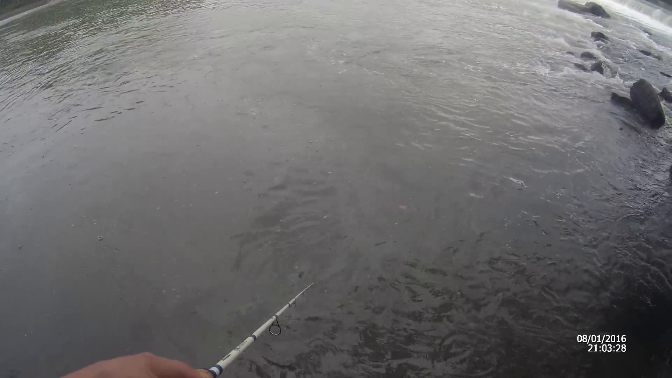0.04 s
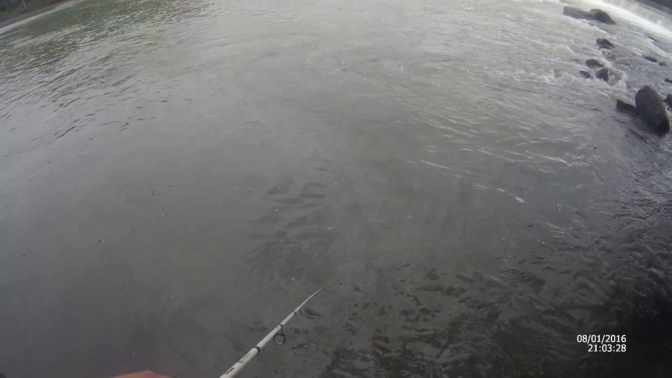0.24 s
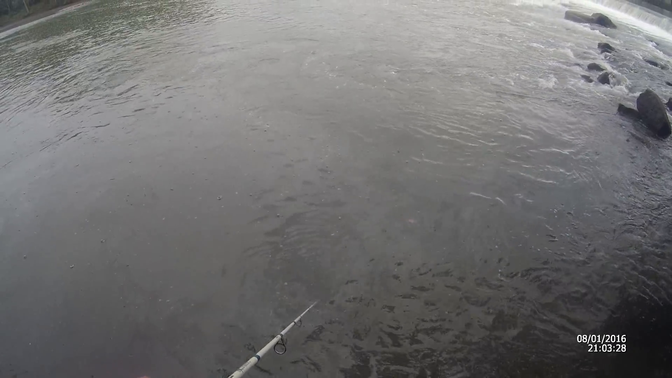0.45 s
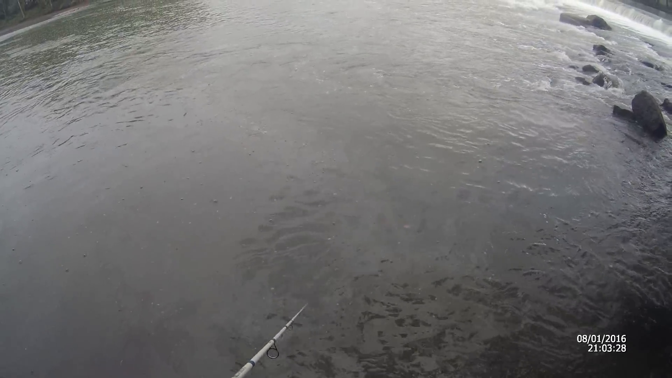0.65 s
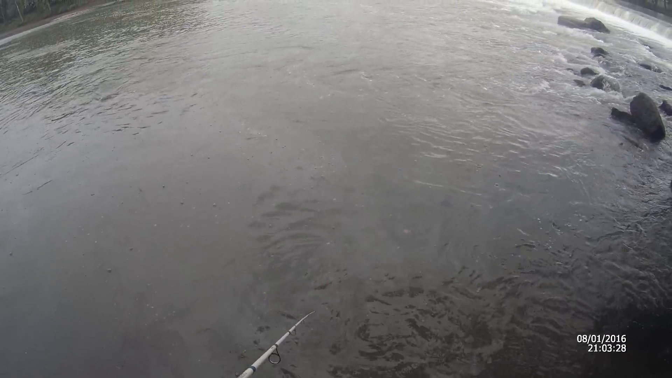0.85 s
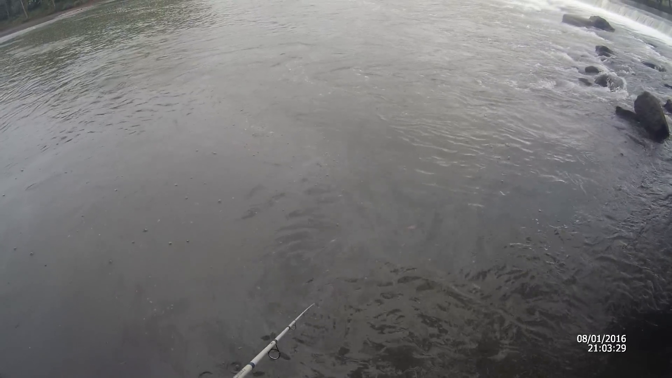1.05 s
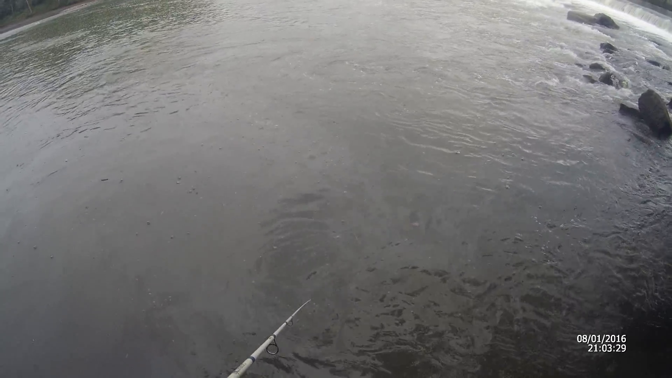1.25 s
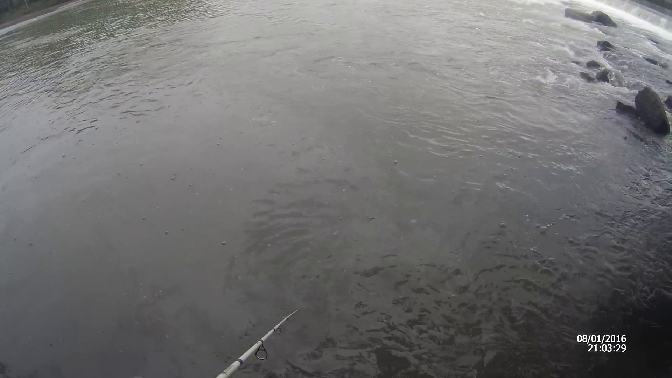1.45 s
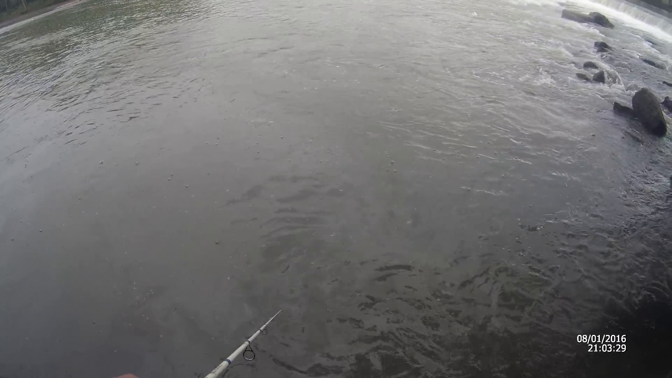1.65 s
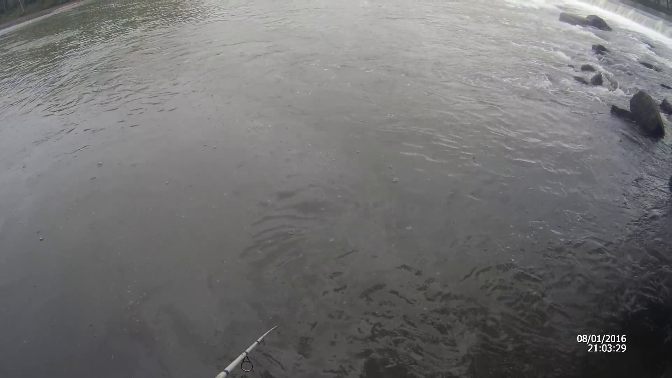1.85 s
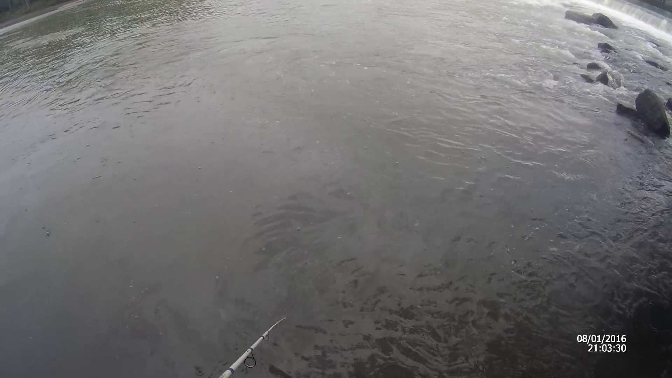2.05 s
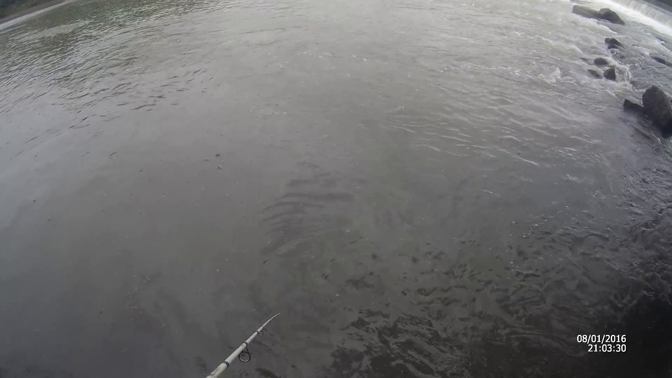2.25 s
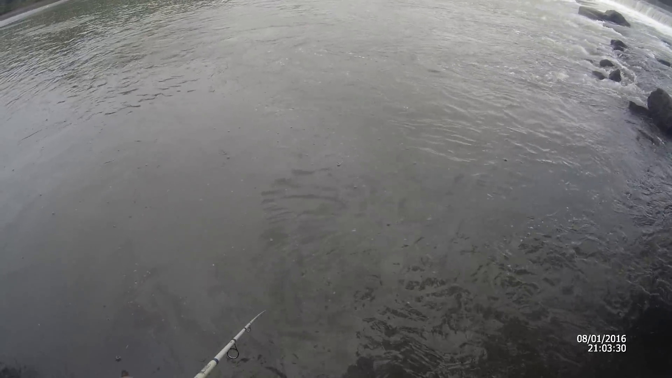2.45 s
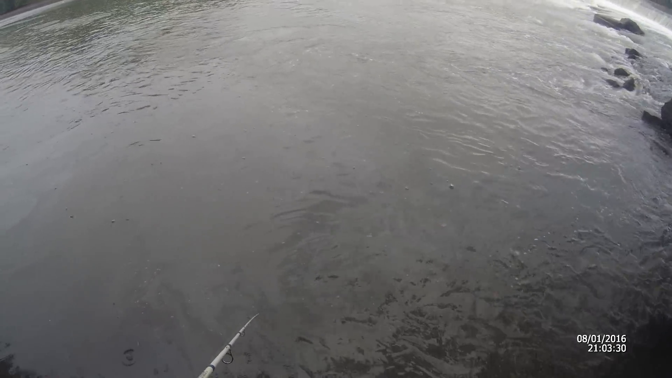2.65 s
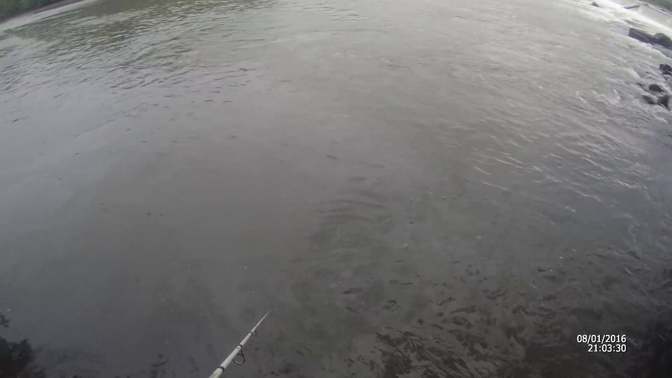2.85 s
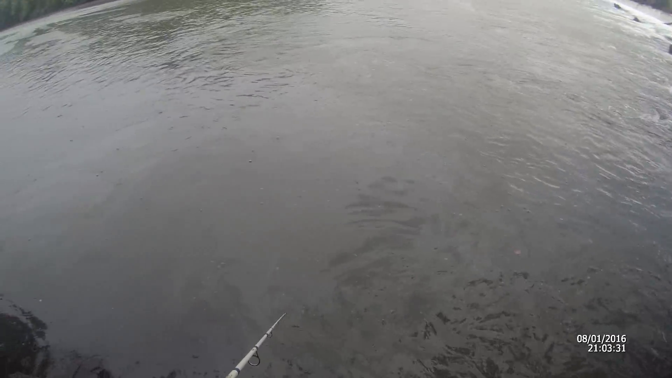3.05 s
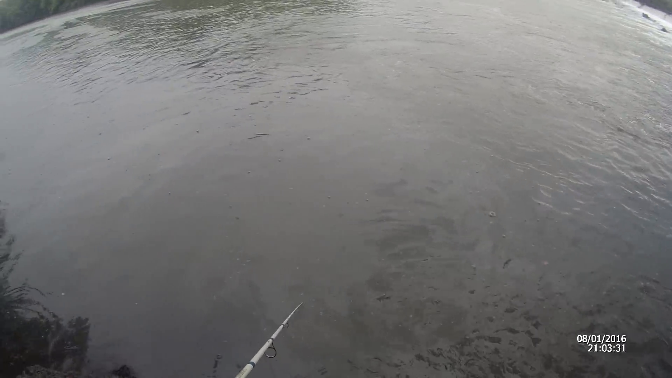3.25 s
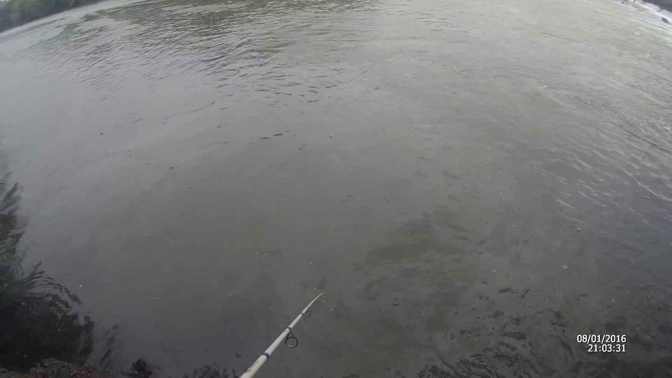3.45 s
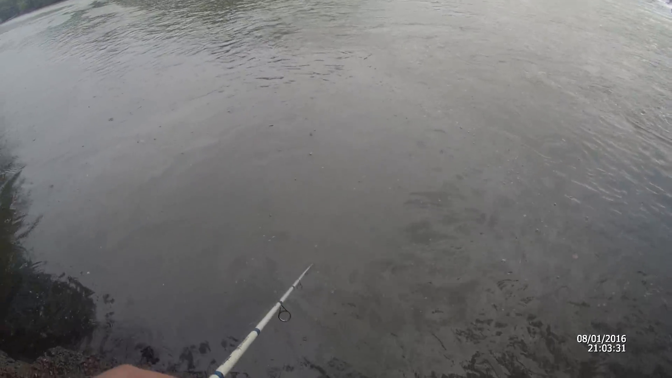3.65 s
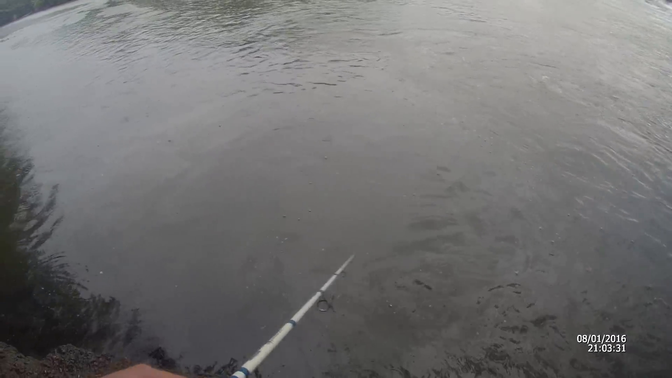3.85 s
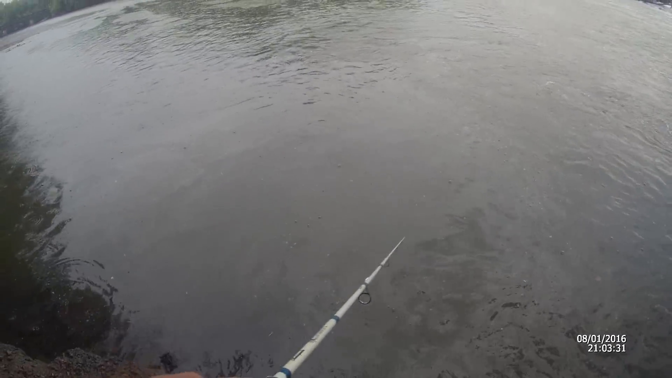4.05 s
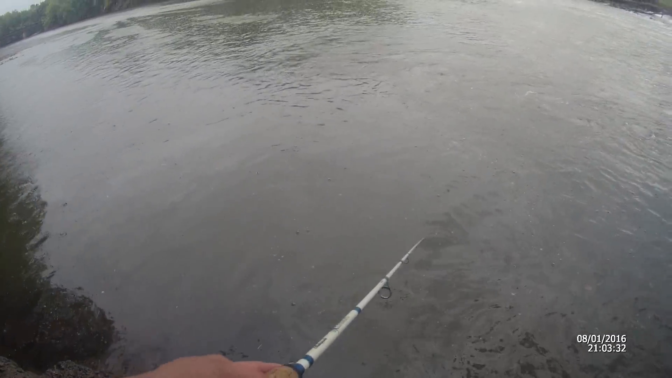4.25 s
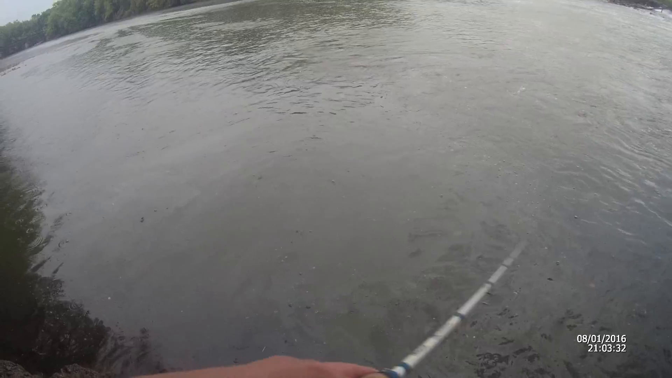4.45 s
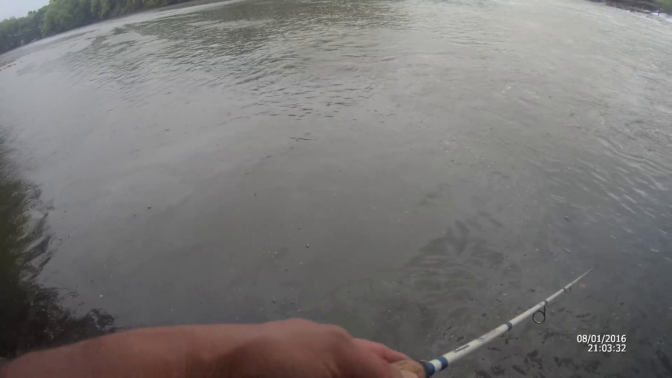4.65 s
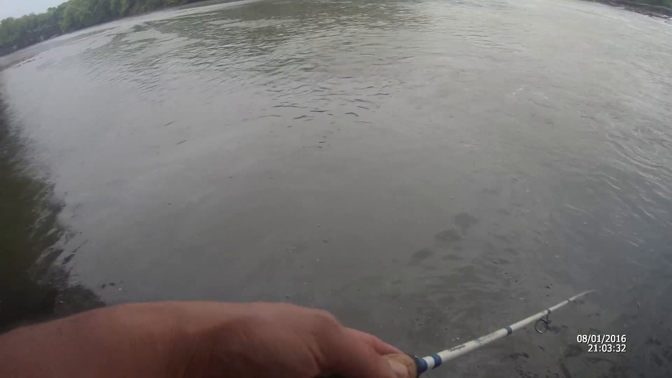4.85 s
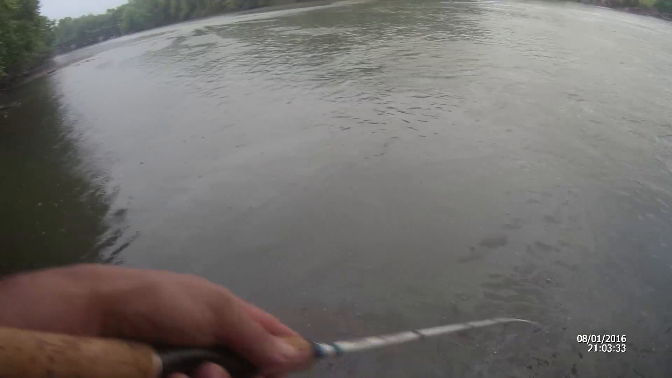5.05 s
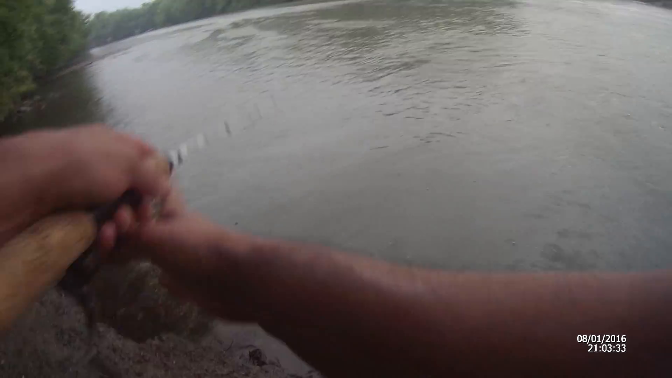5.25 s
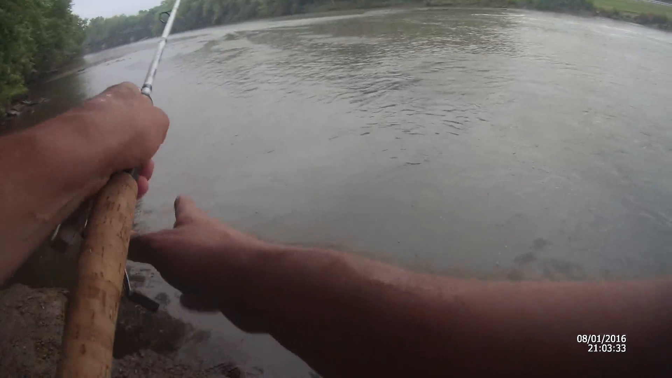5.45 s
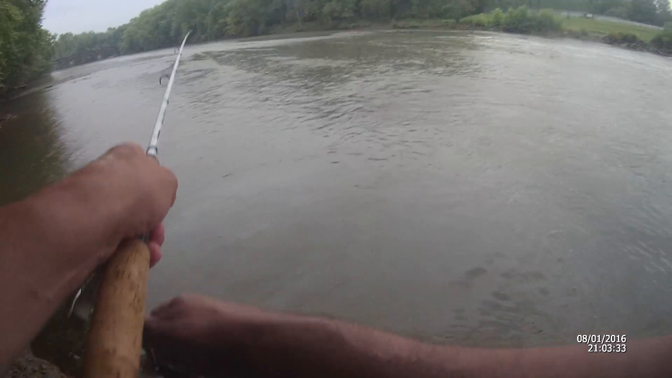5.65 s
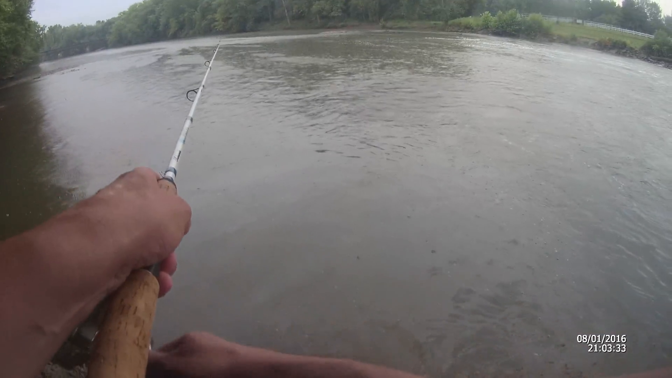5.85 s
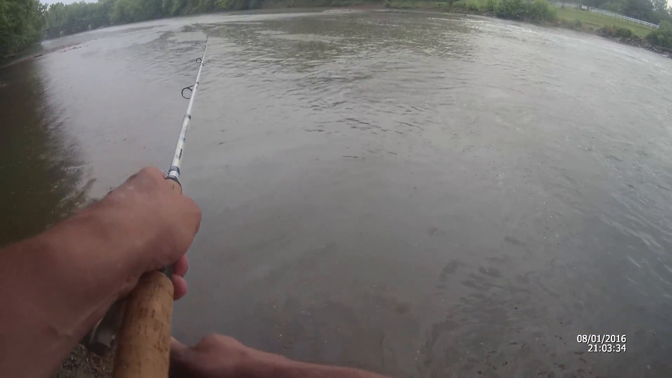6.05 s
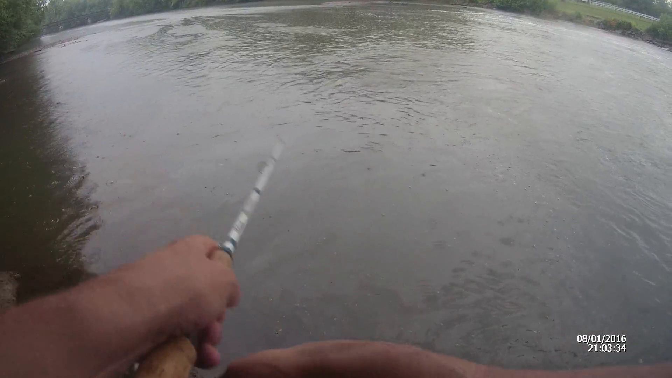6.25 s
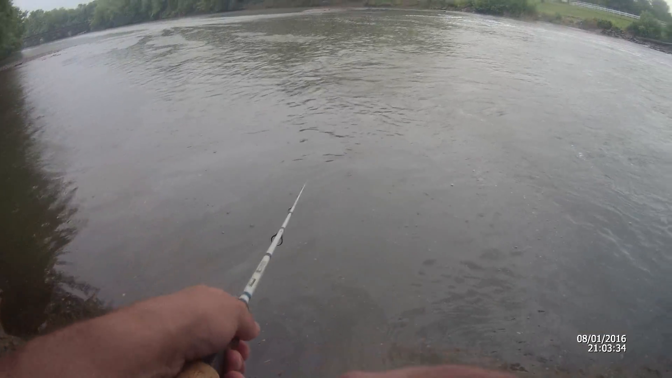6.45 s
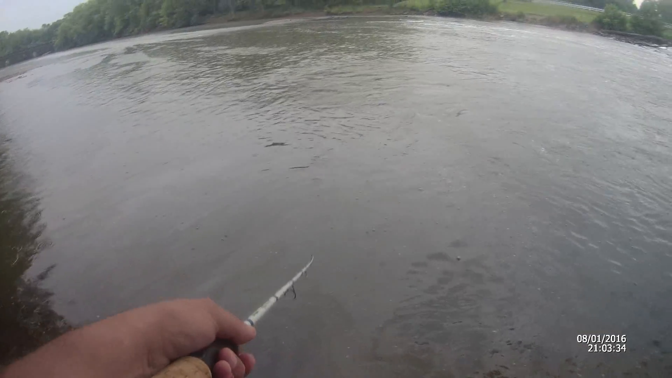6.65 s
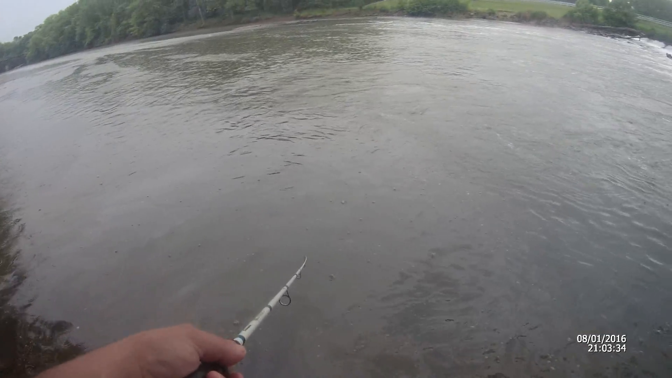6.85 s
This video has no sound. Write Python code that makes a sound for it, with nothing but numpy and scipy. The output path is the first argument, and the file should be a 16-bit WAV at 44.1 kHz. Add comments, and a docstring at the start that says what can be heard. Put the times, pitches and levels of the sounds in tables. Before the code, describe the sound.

Continuous dull river noise, strongest in the midrange with little treble, heard by a microphone enclosed in plastic outdoors. A crisp, very short drop click stands out early. Later the angler moves: low chest bumps, plasticky ticks, a knock and a quick rasp of fabric with a swell of rumble come tightly together, followed by small separate thumps. A weak hum fades near the end while faint hiss and whine remain.

```python
"""At a river bank a small camera in a sealed plastic case hangs on an angler's chest.
The water's rush, noise with a drifting spectrum, comes muffled over low sway noise, a hum, hiss and whine.
A drop clicks on the case: impulses excite its damped modes. Ticks do the same with short noise bursts.
Thuds are decaying sines, low but for one higher knock, and a rub of cloth is stick-slip noise through
resonances with a rumble; these come as the angler swings the rod."""
import sys
import numpy as np
from scipy import signal
from scipy.fft import rfft, irfft, next_fast_len
from scipy.io import wavfile
from scipy.ndimage import uniform_filter1d

SR = 44100
rng = np.random.default_rng(int(sys.argv[2]) if len(sys.argv) > 2 else 0)


def store_pcm(level_fs):
    """Save levels as 16-bit WAV."""
    pcm = np.round(np.clip(level_fs, -1, 1) * 32767).astype(np.int16)
    wavfile.write(sys.argv[1], SR, np.atleast_2d(pcm).T)


N = 304982


def gain_of(db):
    """Level definition: decibels to an amplitude factor."""
    return 10 ** (np.asarray(db) / 20)


def evened(x):
    """Normalization of signal power: scales to rms 1."""
    return x / np.sqrt(np.mean(x ** 2) + 1e-20)


def read(points, hz):
    """Linear interpolation of a spectrum on a log-frequency axis."""
    f, value = np.transpose(points)
    return np.interp(np.log(hz + 1), np.log(f + 1), value)


def curve(rows, t):
    """Linear interpolation of a (t/s, level/dB) table at the times t."""
    times, level_db = np.transpose(rows)
    return np.interp(t, times, level_db)


def add(mix, s, sound):
    """Superposition: adds a sound into the mix at s seconds."""
    part = mix[round(s * SR):][:len(sound)]
    part += sound[:len(part)]


def resonate(x, hz, width):
    """Resonance by heterodyning: shifts hz to zero, smooths and shifts back, with gain 1 at the peak."""
    turn = np.exp(2j * np.pi * hz * np.arange(len(x)) / SR)
    r = np.exp(-np.pi * width / SR)
    smooth = signal.lfilter([1 - r], [1, -r], x / turn)
    return 2 * (turn * smooth).real


def coloured(points):
    """Spectral shaping: white noise weighted in frequency gives steady noise of rms 1."""
    size = next_fast_len(N)
    spectrum = rfft(rng.standard_normal(size))
    weight = gain_of(read(points, np.fft.rfftfreq(size, 1 / SR)))
    return evened(irfft(spectrum * weight, size)[:N])


def river(patchy_db=0.5, flicker_db=0.44):
    """Turbulent noise: random short-time spectra with drifting patches and a flicker shared by all bands."""
    # the rush inside the case: f/Hz, relative spectral density level/dB
    rush_spectrum = [(88, -27), (150, -4), (422, -6), (870, -16), (944, -11), (1090, -16.5), (1230, -4.5),
                     (1550, 1.5), (1710, -7), (2220, -9), (2930, -19.5), (4420, -21.5), (4960, -22),
                     (5560, -14.5), (7600, -39), (9880, -71), (16700, -120)]
    # narrow humps that the case adds: f/Hz, width/Hz, level added at the centre/dB
    case_humps = [(2620, 250, 0.5), (3530, 180, 2), (4220, 150, 2), (5740, 390, -0.5)]
    # level of the rush: t/s, level/dB
    rush_level = [(0.0, -50), (1.5, -49.5), (4.1, -51), (4.45, -50), (5.3, -52.5), (6.92, -51)]
    frames, hz = N // 256 + 5, np.fft.rfftfreq(1024, 1 / SR)
    a, b, patches = rng.standard_normal((frames, 513, 3)).T
    patches = uniform_filter1d(patches, size=10, axis=0)  # over frequency
    patches = evened(uniform_filter1d(patches, size=12, axis=1))  # over time
    flicker = evened(uniform_filter1d(rng.standard_normal(frames), size=3))
    level_db = curve(rush_level, np.arange(frames) * 256 / SR)
    humps_db = sum(db / (1 + (2 * (hz - f) / width) ** 2) for f, width, db in case_humps)
    colour_db = read(rush_spectrum, hz) + humps_db
    field_db = colour_db[:, None] + level_db - level_db.mean()
    field_db = field_db + patchy_db * patches + flicker_db * flicker
    spectra = (a + 1j * b) * gain_of(field_db)
    rush = signal.istft(spectra, nperseg=1024, noverlap=768)[1][:N]
    return gain_of(level_db.mean()) * evened(rush)


def sway():
    """Slow pressure of air and body sway: low-band noise plus a slower one, amplitude-modulated by heaves."""
    # slow pressure on the microphone: f/Hz, relative spectral density level/dB
    sway_spectrum = [(9, -16), (15, -4.5), (25, -2.5), (50, -8), (100, -10.5), (200, -27.5), (400, -56)]
    # Gaussian swells as the body moves: t/s, level/dB, half length to 1/e/s
    heave_swells = [(0.59, -59, 0.11), (3.605, -55, .12), (3.95, -50, .12), (5.206, -42.5, 0.18),
                    (5.5, -45.5, 0.091), (6.3, -50, 0.24)]
    sway_db, heave_rest_db = -57.5, -60
    t = np.arange(N) / SR
    heave = coloured([(1, -26), (4, -6), (11, -0.5), (20, -13), (30, -78.5)])  # f/Hz, level/dB
    swell = sum(gain_of(db) * np.exp(-((t - s) / half) ** 2) for s, db, half in heave_swells)
    return gain_of(sway_db) * coloured(sway_spectrum) + (gain_of(heave_rest_db) + swell) * heave


def hum():
    """Pure tone plus narrow-band noise: their beating makes the hum tremble as it sags and fades."""
    hum_hz, start_db, sag_db_per_s = 125.3, -62, 0.8
    fade_s = 5.1  # the fade to silence starts here and takes one second
    t = np.arange(N) / SR
    tone = np.sqrt(2) * np.sin(2 * np.pi * hum_hz * t)
    fuzz = evened(resonate(rng.standard_normal(N), hum_hz, 3.0))
    fade = np.clip(fade_s + 1 - t, 0, 1)
    return gain_of(start_db - sag_db_per_s * t) * (0.89 * tone + 0.39 * fuzz) * fade


def electronics():
    """Electronic noise floor: the preamplifier's broadband hiss and steady sinusoids of whine."""
    # steady tones: f/Hz, rms level/dB
    whine_tones = [(3208, -82), (6115, -83), (6417, -77.5), (6616, -86), (6718, -85.5), (7219, -98),
                   (9125, -100), (10637, -87), (12828, -96)]
    hiss_db = -71.5
    t = np.arange(N) / SR
    whine = np.zeros(N)
    for hz, db in whine_tones:
        whine += gain_of(db) * np.sqrt(2) * np.sin(2 * np.pi * (hz * t + rng.random()))
    hiss = coloured([(100, 9.4), (7000, 2.0), (16000, 1.0)])  # f/Hz, level/dB
    return gain_of(hiss_db) * hiss + whine


def ring(low_db, mid_db, high_db):
    """Modal impulse response of the case: the place of a blow weights its damped modes; also a jolt."""
    # modes of the case: f/Hz, level/dB, 60 dB decay time/s
    case_modes = [(1130, -12.5, 0.012), (1583, -9.5, 0.014), (1770, 1.5, 0.0078), (2590, -14.5, 0.017),
                  (2950, -16, 0.014), (3420, -14, 0.0092), (3850, -11.5, 0.014), (4310, -11.5, 0.013),
                  (5150, -14.5, 0.0085), (5740, -9, 0.017)]
    t = np.arange(2000) / SR
    # f/Hz, weight/dB
    place = [(1000, low_db), (1600, 0), (2500, high_db / 2), (3000, mid_db), (3400, high_db / 2),
             (4400, min(high_db, 3)), (5700, high_db)]
    modes = np.zeros(len(t))
    for hz, db, t60 in case_modes:
        modes += gain_of(db + read(place, hz) - 60 * t / t60) * np.sin(2 * np.pi * hz * t)
    # the whole case jolts
    knock = gain_of(low_db - 2.5 - 60 * t / 0.0045) * np.sin(2 * np.pi * 600 * t)
    wall = signal.butter(7, [900, 6050], "band", fs=SR, output="sos")
    return signal.sosfilt(wall, modes), knock


def treble_leak(x):
    """High-pass transmission: only thin treble leaks past the wall."""
    return signal.sosfilt(signal.butter(4, 8000, "high", fs=SR, output="sos"), x)


def click():
    """Impulsive excitation: a hard click strikes and bounces twice, ringing the case."""
    # contacts: t/s, level/dB, hardness as weight of the middle and upper modes/dB
    contacts = [(2.5162, -20, -4), (2.5168, -16, 3), (2.5179, -19, -14)]
    out = np.zeros(N)
    decay = np.exp(-np.arange(600) / SR / 0.0011)
    for s, db, hard_db in contacts:
        modes, _ = ring(0, hard_db, hard_db)
        add(out, s, gain_of(db) * modes)
        burst = rng.standard_normal(600) * decay
        add(out, s, gain_of(db + hard_db - 30.0) * treble_leak(burst))
    return out


def thuds():
    """Damped oscillation: soft bumps are low sines of a few cycles, with one higher, short knock among them."""
    # bumps against the chest and the knock: t/s, level/dB, f/Hz
    bumps = [(3.369, -32, 97), (5.075, -34, 140), (5.092, -34, 110), (5.108, -39, 119), (5.135, -43, 130),
             (5.149, -38, 139), (5.164, -25.5, 158), (5.174, -26.5, 684), (5.183, -46, 150),
             (5.27, -39, 130), (5.33, -39, 112), (5.623, -38, 100), (5.647, -34.5, 100), (5.675, -36, 100),
             (5.809, -36, 104), (5.916, -36, 97), (6.205, -46, 60), (6.547, -37, 90), (6.597, -36, 100),
             (6.631, -34.5, 100), (6.658, -39, 100)]
    decay_cycles, shortest_s = 5.5, 0.018  # 60 dB decay time in cycles, and its least value
    out = np.zeros(N)
    t = np.arange(SR // 5) / SR
    for s, db, hz in bumps:
        t60 = max(decay_cycles / hz, shortest_s)
        swell = np.minimum(hz * t / 0.43, 1)  # rises over 0.43 of a cycle
        add(out, s, gain_of(db - 60 * t / t60) * np.sin(2 * np.pi * hz * t) * swell)
    return out


def ticks():
    """Convolution of excitation and impulse response: short bursts of contacts ring the case."""
    # light ticks on the case: t/s, level/dB, colour
    tick_events = [(3.37, -42.5, "sharp"), (3.42, -43, "middle"), (4.039, -40, "sharp"),
                   (4.263, -40, "even"), (5.073, -33, "dull"), (5.092, -38, "dull"), (5.121, -48, "bright"),
                   (5.136, -50, "bright"), (5.15, -49, "bright"), (5.174, -30.5, "broad"),
                   (5.260, -36.5, "broad"), (5.302, -33.5, "middle"), (5.344, -37, "middle"),
                   (5.359, -42, "middle"), (5.503, -39, "full"), (5.644, -39.5, "middle"),
                   (5.673, -40.5, "full"), (5.807, -36, "full"), (5.913, -39, "dull"),
                   (6.204, -34.5, "even"), (6.209, -45, "bright"), (6.217, -48, "bright"),
                   (6.246, -47, "bright"), (6.518, -43, "full"), (6.547, -42.5, "full"),
                   (6.595, -40, "dull"), (6.627, -42, "dull"), (6.656, -39, "dull")]
    # colours by where a tick lands: weights of low, middle and high modes/dB, treble past the wall/dB,
    # scrape decay time/s before it is held within 0.1 to 10 ms
    tick_colours = {"dull": (5.5, -8, -16, -30, 0.06), "full": (5, 9.5, -18, -30, 0.1),
                    "middle": (-14, 7, -22, -30, 0.3), "even": (-18, -6, -11, -7, -0.7),
                    "bright": (-15, -5, 10, -8, -0.1), "sharp": (-19, 12, 7, 1, .002),
                    "broad": (3.5, -2, -8.5, -18, -0.4)}
    out = np.zeros(N)
    t = np.arange(600) / SR
    for s, db, colour in tick_events:
        low_db, mid_db, high_db, leak_db, length = tick_colours[colour]
        scrape = rng.standard_normal(600) * np.exp(-t / np.clip(length, 1e-4, 0.01))
        scrape[0] = 2  # a firm first contact
        scrape = scrape / np.linalg.norm(scrape)  # unit energy
        modes, knock = ring(low_db, mid_db, high_db)
        add(out, s, gain_of(db) * signal.fftconvolve(scrape, modes + knock))
        add(out, s, gain_of(db + leak_db) * treble_leak(scrape))
    return out


def rub(slips_per_s=2400, spread_db=3.0, judder_hz=70.2):
    """Stick-slip friction: random cloth slips excite the case; a low rumble passes through the strap."""
    # resonances of the rub: f/Hz, width/Hz, level/dB
    rub_modes = [(460, 430, -17), (870, 300, -7), (1564, 240, 1.5), (2510, 240, -13), (2980, 240, -12),
                 (4130, 450, -20.5), (5600, 300, -16.5)]
    # rumble through the strap: t/s, level/dB
    strap_level = [(5.03, -79), (5.094, -46), (5.184, -43.5), (5.21, -48), (5.264, -46), (5.302, -57),
                   (5.358, -49), (5.42, -64)]
    # one stroke of cloth swells to its peak, sags, then stops
    peak_s, end_s, peak_db = 5.185, 5.262, -41.5
    swell_db_per_s, sag_db_per_s, stop_db_per_s = 350, 25, 700  # the stop adds to the sag
    t = np.arange(strap_level[0][0], strap_level[-1][0], 1 / SR)
    stroke_db = peak_db - swell_db_per_s * np.maximum(peak_s - t, 0)
    stroke_db -= sag_db_per_s * np.maximum(t - peak_s, 0)
    stroke_db -= stop_db_per_s * np.maximum(t - end_s, 0)
    strength = gain_of(spread_db * np.minimum(rng.exponential(1, len(t)), 4))
    slips = strength * (rng.random(len(t)) < slips_per_s / SR)
    # the cloth catches and lets go in a quick rhythm
    judder = 1 + 0.24 * np.cos(2 * np.pi * judder_hz * (t - peak_s))
    drive = judder * slips * rng.choice([-1, 1], len(t))
    body = np.zeros(len(t))
    for hz, width, db in rub_modes:
        body += gain_of(db) * evened(resonate(resonate(drive, hz, width), hz, 2 * width))
    # the wall stops the treble
    body = signal.sosfilt(signal.butter(6, 6400, fs=SR, output="sos"), body)
    rumble = evened(resonate(resonate(rng.standard_normal(len(t)), 86, 170), 86, 170))
    both = gain_of(stroke_db) * evened(body) + gain_of(curve(strap_level, t)) * rumble
    out = np.zeros(N)
    add(out, t[0], both * signal.windows.tukey(len(t), 0.1))  # soft ends
    return out


def scene():
    """Superposition: all sources add at the one microphone."""
    steady = river() + sway() + hum() + electronics()
    handling = click() + thuds() + ticks() + rub()
    return (steady + handling)[None]


def record(dry):
    """Band limitation: the recorder's linear-phase low-pass."""
    edge_hz = 15750
    low_pass = signal.firwin(511, edge_hz, window=("kaiser", 9), fs=SR)
    return signal.oaconvolve(dry, low_pass[None], "same")


dry = scene()
out = record(dry)
store_pcm(out)
```